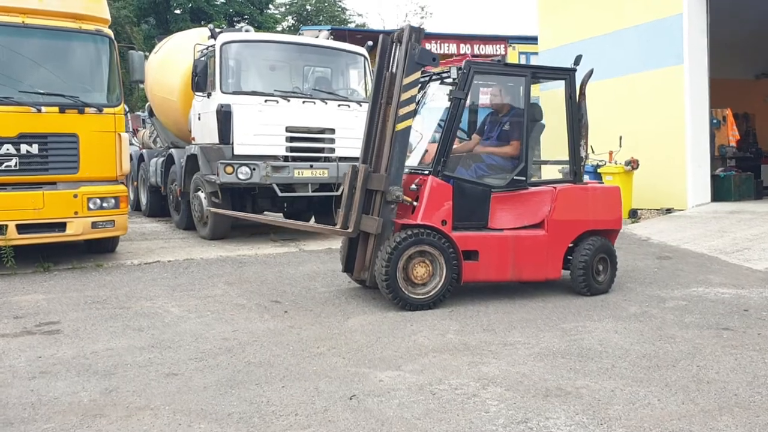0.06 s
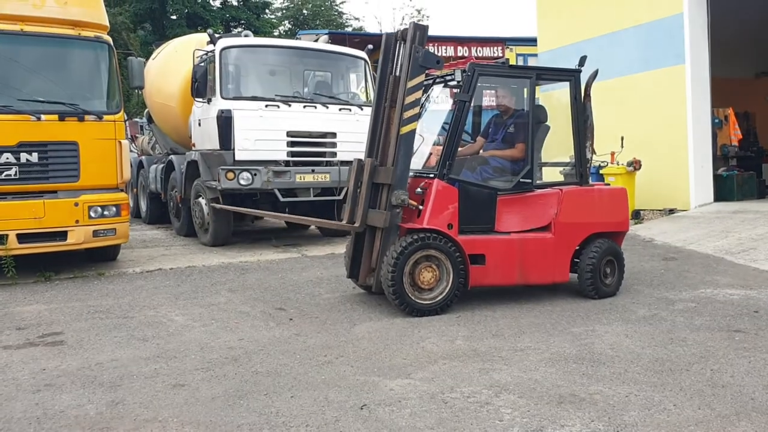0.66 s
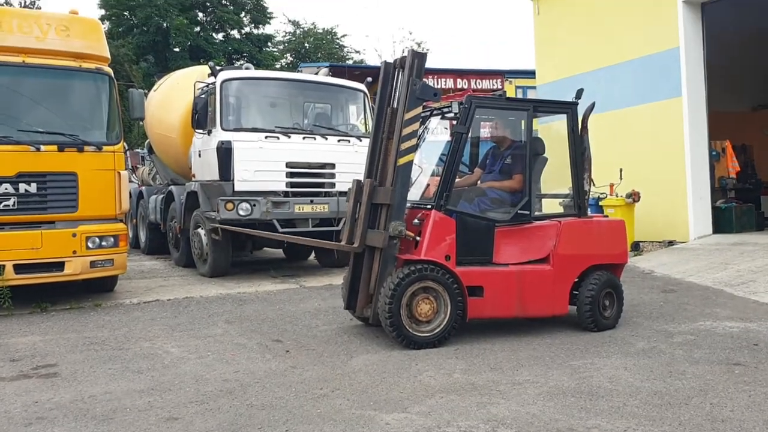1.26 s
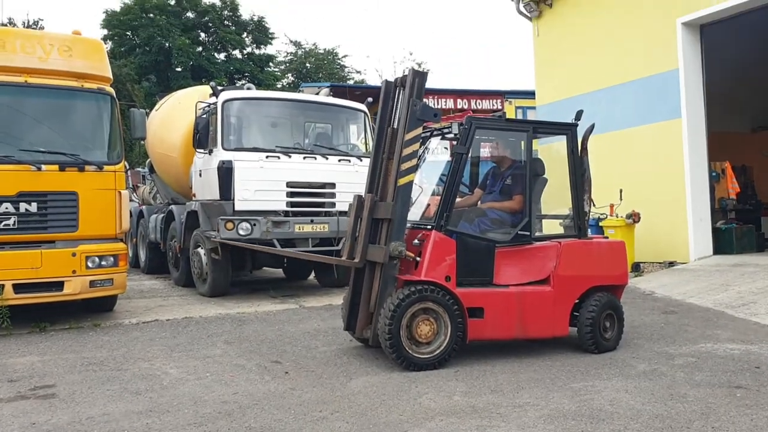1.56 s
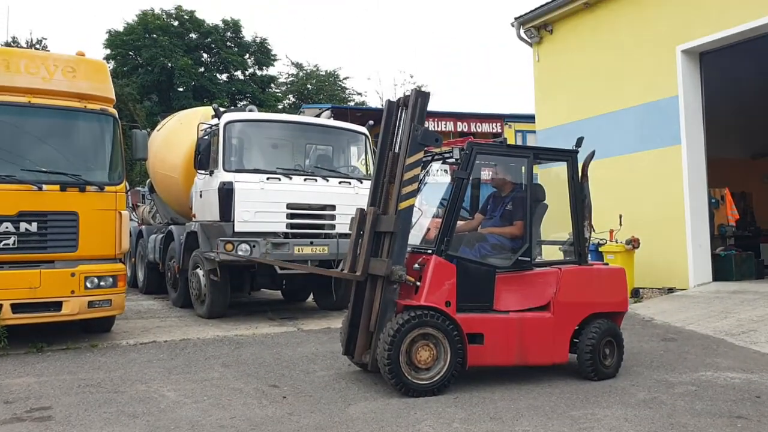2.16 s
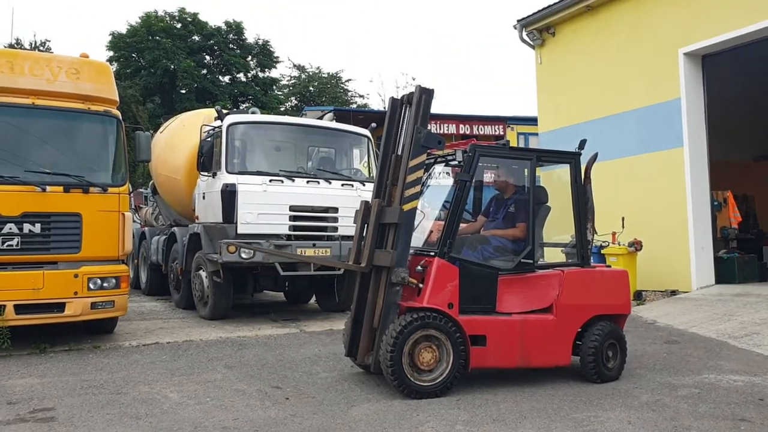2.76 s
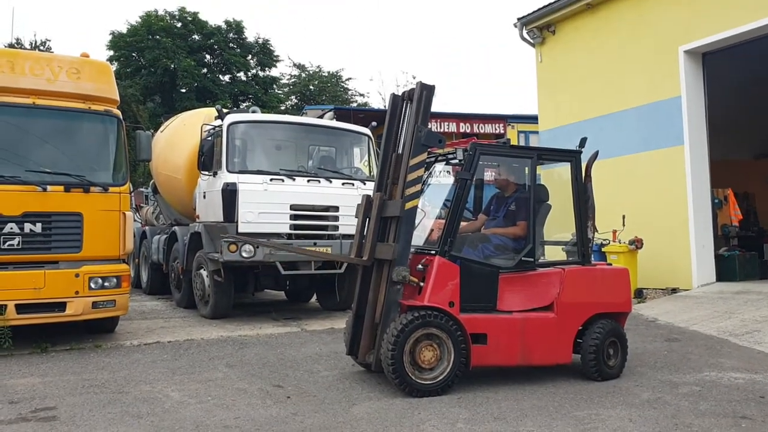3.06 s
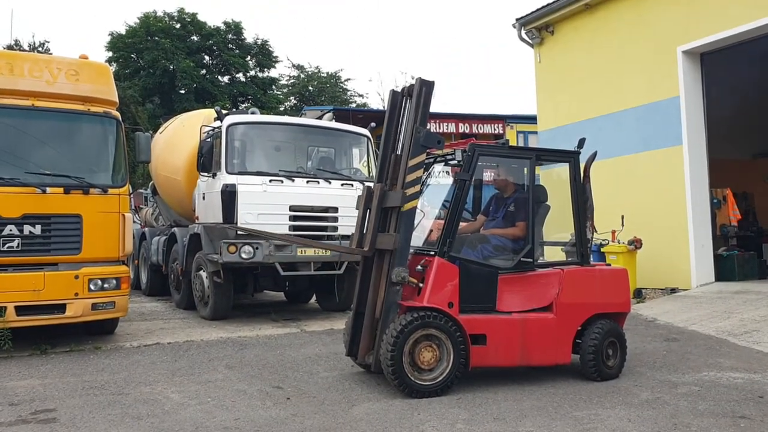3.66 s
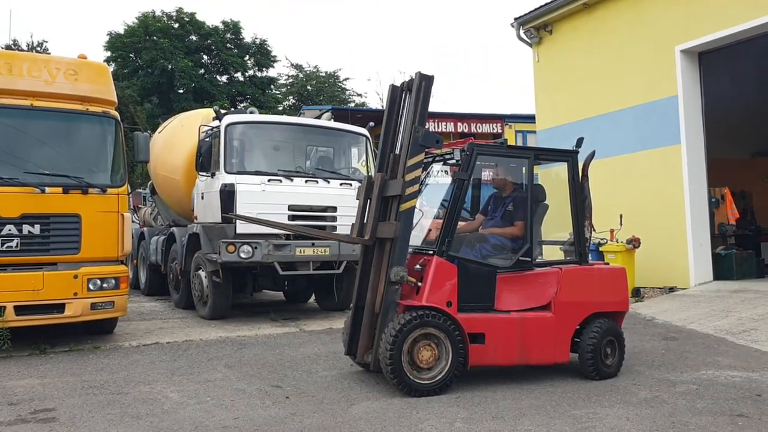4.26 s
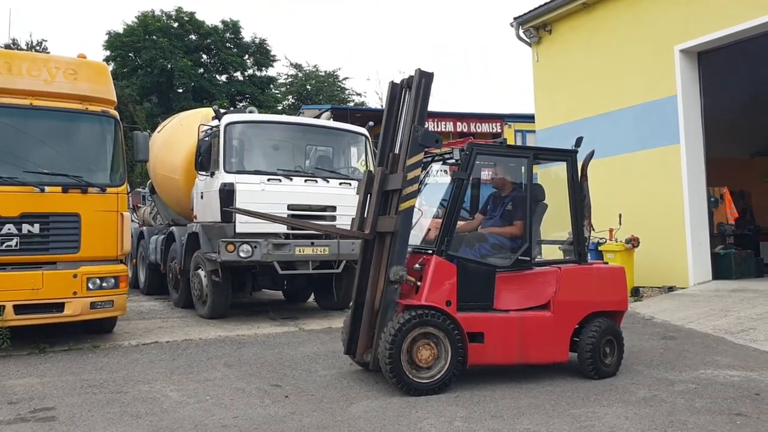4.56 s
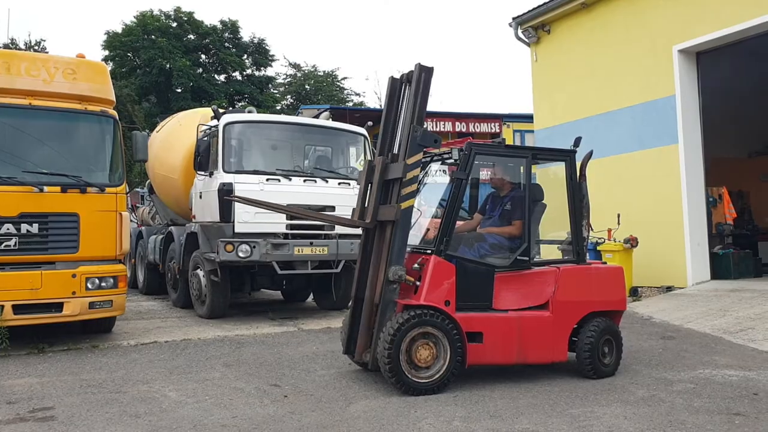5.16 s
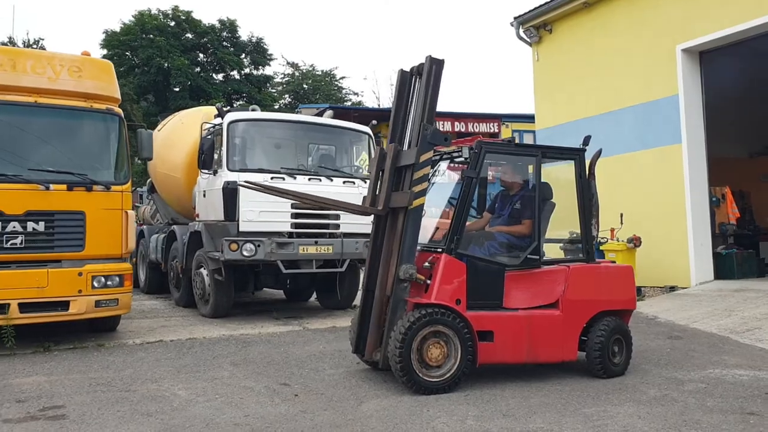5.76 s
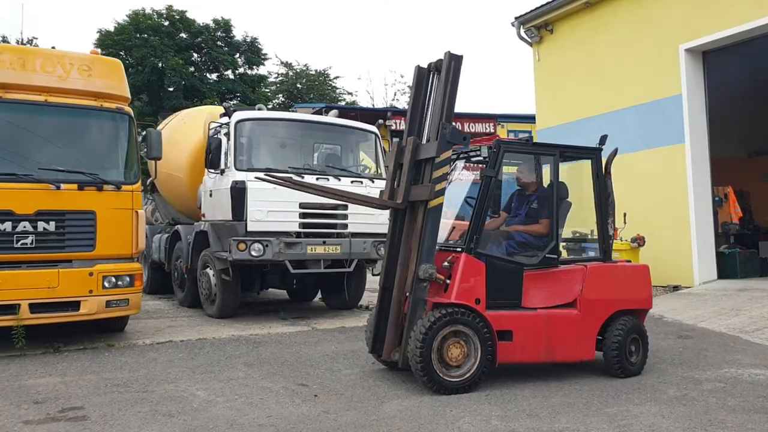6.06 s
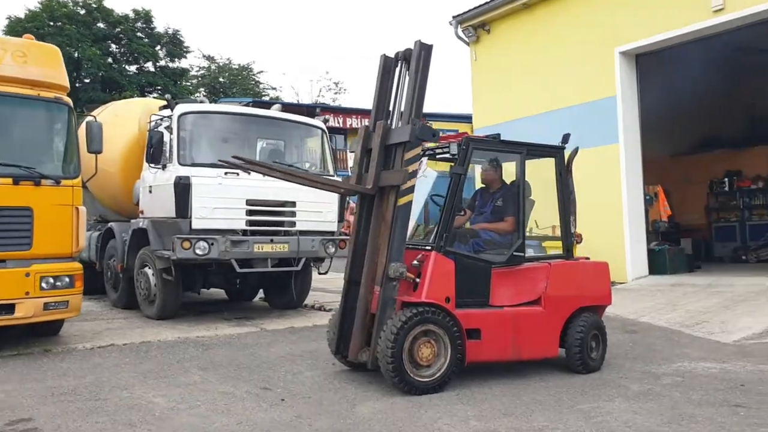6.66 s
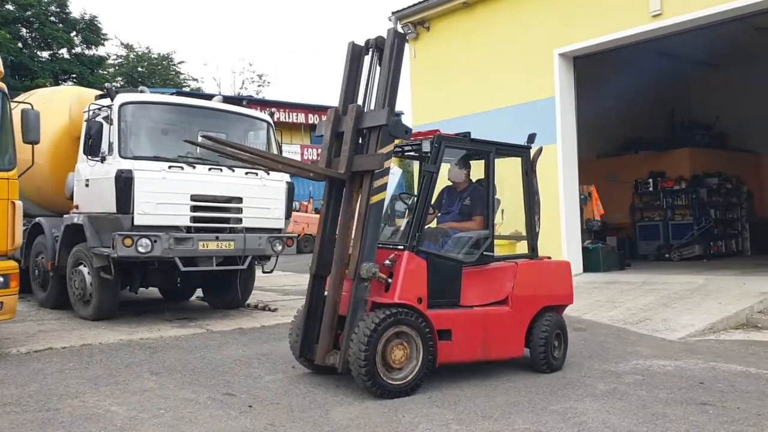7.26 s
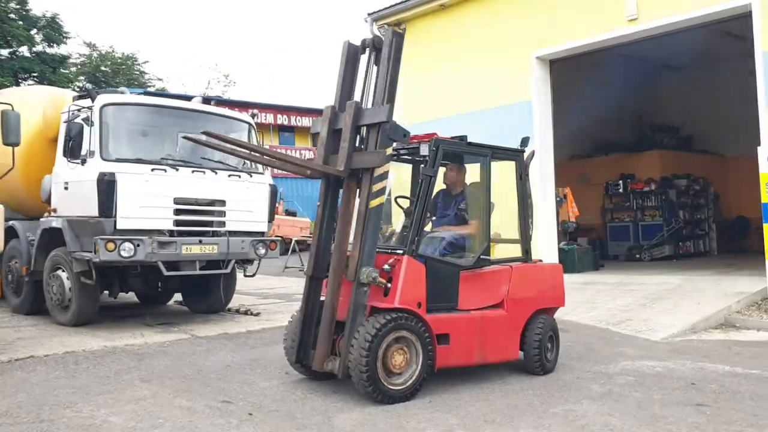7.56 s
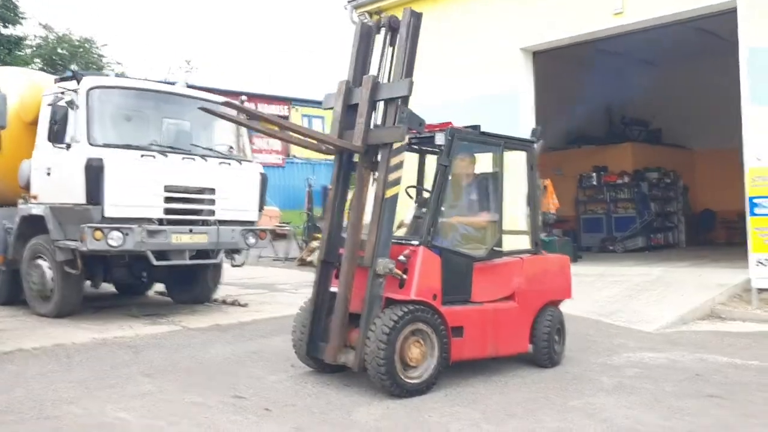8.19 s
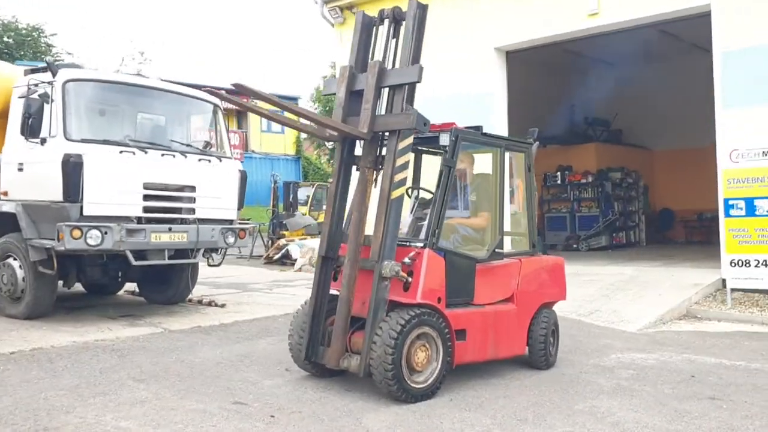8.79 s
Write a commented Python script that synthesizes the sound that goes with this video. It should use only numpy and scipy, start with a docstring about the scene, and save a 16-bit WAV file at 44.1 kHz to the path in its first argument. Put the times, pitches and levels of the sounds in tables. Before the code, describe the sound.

A diesel forklift is already idling at the start, heard from nearby in an open yard through a hand-held stereo microphone, with the clatter leaning to the left. Its exhaust gives a deep, even throb under a fast metallic rattle and fine ticking. Thin, slightly wavering whines from the gears, fan and hydraulic pump sit over a low rumble. Hollow knocks stand out of the engine's rhythm at irregular moments, the hardest at about 1.6 seconds.

At about 5.8 seconds the throttle opens: the engine surges briefly, climbs moderately in pitch within half a second, and then holds that faster, slightly louder pace. From about 6.7 seconds the truck turns and rolls off, so the whines shift in tone and the low exhaust hum grows fuller. The engine is still running strongly at the end, near 9 seconds.

```python
"""A diesel forklift chugs and clatters at idle in a yard, then speeds up and rolls off.
Its four cylinders fire in turn: each firing booms out of the exhaust and knocks the metal of the engine.
The gears, the hydraulic pump and the belt-driven fan whine along over a low rumble.
A hand-held pair of microphones hears the bass alike and the treble differently."""
import sys
import numpy as np
from scipy import signal
from scipy.fft import rfft, irfft
from scipy.io import wavfile
from scipy.ndimage import map_coordinates

SR = 44100
rng = np.random.default_rng(int(sys.argv[2]) if len(sys.argv) > 2 else 0)


def store_pcm(level_fs):
    """Save levels as 16-bit WAV."""
    pcm = np.round(np.clip(level_fs, -1, 1) * 32767).astype(np.int16)
    wavfile.write(sys.argv[1], SR, np.atleast_2d(pcm).T)


N = 393813
TIME = np.arange(N) / SR
BINS_HZ = np.fft.rfftfreq(N, 1 / SR)
THROTTLE_S = 5.773  # when the throttle opens

# how far the truck has turned its tail away: time_s, share (0 to 1)
TURNED_AWAY = [(0, 0), (6.7, 0.09), (7.5, 0.76), (8.1, 0.92), (8.93, 0.55)]


def amp(db):
    """Turns decibels into a gain."""
    return np.exp(np.asarray(db, np.float32) * np.float32(np.log(10) / 20))


def unit(x):
    """Scales a signal to an average (rms) level of 1."""
    return x / np.sqrt(np.mean(x ** 2) + 1e-20)


def radians(cycles):
    """The angle within the current cycle."""
    return (2 * np.pi * (cycles - np.floor(cycles))).astype(np.float32)


def ramp(start_s, end_s):
    """Goes evenly from 0 to 1 between two times."""
    return np.clip((TIME - start_s) / (end_s - start_s), 0, 1)


def over_time(points):
    """Reads a time table at every sample."""
    return np.interp(TIME, *np.transpose(points))


def over_hz(points):
    """Reads a pitch table at every frequency."""
    hz, value = np.transpose(points)
    return np.interp(np.log(BINS_HZ + 1), np.log(hz + 1), value)


def colour(x, points):
    """Shapes a sound's lows and highs by a table, cuts what lies outside it, and scales to level 1."""
    edges = 1 / (1 + (BINS_HZ / points[-1][0]) ** 16 + (points[0][0] / (BINS_HZ + 1)) ** 16)
    return unit(irfft(rfft(x) * amp(over_hz(points)) * edges, N))


def drift(hz, size=2048):
    """Two slow random curves of level 1."""
    rates = np.fft.rfftfreq(size, N / SR / size)
    slow = irfft(rfft(rng.standard_normal((2, size))) / (1 + (rates / hz) ** 2), size)
    return np.array([np.interp(TIME, np.linspace(0, TIME[-1], size), unit(row)) for row in slow])


def tone(cycles, db, waver, waver_hz):
    """A note whose strength and timing wander along two paths through the yard."""
    phase = radians(cycles + rng.random()) + waver * drift(waver_hz)
    strength = np.sqrt(2 / (1 + waver ** 2)) * amp(db) * (1 + waver * drift(waver_hz))
    return strength * np.sin(phase.astype(np.float32))


def rev_up(lag_s=0.106):
    """From idle (0) to revved (1): the heavy flywheel starts slowly, gathers pace and levels off."""
    age = np.maximum(TIME - THROTTLE_S, 0) / lag_s
    return 1 - (1 + age) * np.exp(-age)


def fuel_surge(peak_db=3, rise_s=0.11):
    """Extra loudness in dB from a surge of fuel, which is cut back as the engine reaches speed."""
    age = np.maximum(TIME - THROTTLE_S, 0) / rise_s
    return peak_db * (age * np.exp(1 - age)) ** 2


def yard_rumble(revved):
    """Low noise in the yard, louder once the engine revs."""
    # the rumble's tone colour: pitch_hz, relative_db
    rumble_shape = [(12, -11), (25, -7), (50, -8), (75, 6)]
    return amp(-43.5 + 6.1 * revved) * colour(rng.standard_normal((2, N)), rumble_shape)


def gear_whine(turns, revved):
    """Gears turn with the crankshaft, so their notes rise with engine speed."""
    # gear and weaker pump notes: cycles_per_turn (rounded below), idle_db, revved_db, turned_change_db
    gear_notes = [(18, -46, -52, 1), (25, -69, -43.5, -8), (28, -55, -44, -4), (30, -54, -40, -3.5),
                  (36, -54.5, -46, -5), (51, -62, -60.5, 14), (56, -53, -52.5, 5.5),
                  (64.2, -70, -46.5, -15), (72.4, -61, -59, 1), (81.54, -66, -40.5, -3.5),
                  (83.4, -59, -50, 7), (112.7, -61, -55, -11), (117.5, -48, -71, 15),
                  (128.5, -57.5, -62, 6)]
    turned, out = over_time(TURNED_AWAY), 0
    for per_turn, idle_db, revved_db, turned_db in gear_notes:
        db = idle_db + (revved_db - idle_db) * revved + turned_db * turned
        out += tone(np.round(per_turn) * turns, db, waver=0.31, waver_hz=6.6)
    return out


def belt_whine(turns, revved, pulley_ratio=1.3917):
    """A belt spins the six-blade fan and the alternator faster than the crankshaft."""
    # fan and alternator notes: cycles_per_pulley_turn (rounded below), idle_db, revved_db
    belt_notes = [(4, -46.5, -49), (6, -42.5, -35.5), (16, -52, -64), (32, -46.5, -52), (48, -52, -51),
                  (96.5, -56, -64)]
    out = 0
    for per_turn, idle_db, revved_db in belt_notes:
        db = idle_db + (revved_db - idle_db) * revved
        out += tone(np.round(per_turn) * pulley_ratio * turns, db, waver=0.14, waver_hz=2.3)
    return out


def pump_whine(turns, rpm, revved, teeth=9, revved_gain_db=6.5):
    """The pump's teeth ripple the oil pressure; a note swells near a pitch at which the casing rings."""
    # how strongly the casing sounds a note at idle: pitch_hz, level_db
    casing_levels = [(790, -47.5), (860, -50), (930, -69), (941, -47), (1580, -49.5), (1745, -44.5),
                     (1770, -50), (1855, -61), (1885, -47), (1970, -48), (2030, -47), (2066, -42),
                     (2250, -59)]
    # each note beams its own way: cycles_per_tooth, early_change_db, turned_change_db
    pump_notes = [(5, 2, -9), (10, -1.5, 4), (11, -2, -16), (12, 5.5, -6)]
    early = 1 - ramp(1.6, 1.9)  # ends as the hand-held microphones settle into place
    turned, out = over_time(TURNED_AWAY), 0
    for per_tooth, early_db, turned_db in pump_notes:
        per_turn = teeth * np.round(per_tooth)
        casing_db = np.interp(per_turn * rpm / 60, *np.transpose(casing_levels))
        db = casing_db + revved_gain_db * revved + early_db * early + turned_db * turned
        out += tone(per_turn * turns, db, waver=0.28, waver_hz=7)
    return out


def knocks(turns, cylinders_db, lead, fade, steady, repeat, uneven_db=1.3):
    """Each firing adds a burst to a steady rattle; lead and fade are counted in crankshaft turns."""
    firing = 2 * (turns + lead)
    age, count = (firing % 1) / 2, firing.astype(int)
    chance = rng.standard_normal(size=512)[count]  # no two firings are equally hard
    strength = amp(np.array(cylinders_db)[count % len(cylinders_db)] + uneven_db * chance)
    burst = strength * np.exp(-age / fade) * (1 - np.exp(-age / 0.0082))
    # the share "repeat" of the rattle comes back every engine cycle (two turns)
    loops = rng.standard_normal((2, 5000))
    place = (turns / 2 % 1) * loops.shape[1]
    pattern = np.array([map_coordinates(loop, [place], mode="grid-wrap") for loop in loops])
    rattle = np.sqrt(repeat) * pattern + np.sqrt(1 - repeat) * rng.standard_normal((2, N))
    return rattle * np.sqrt(burst ** 2 + steady ** 2)


def metal(x, fade_s=0.0073, share=0.36):
    """Cast metal adds a short ring made of many close pitches."""
    tail = rng.standard_normal(size=(2, 1024)) * np.exp(-np.arange(1024) / SR / fade_s)
    tail /= np.linalg.norm(tail, axis=1, keepdims=True)
    return x + share * signal.oaconvolve(x, tail, axes=1)[:, :N]


def resonate(x, hz, width_hz):
    """Makes a sound ring at one pitch, scaled to level 1."""
    r = np.exp(-np.pi * width_hz / SR)
    return unit(signal.lfilter([1, 0, -1], [1, -2 * r * np.cos(2 * np.pi * hz / SR), r * r], x))


def ringing_parts(turns, revved):
    """The firings strike a few metal parts that each ring at a clear pitch."""
    # the parts that ring: pitch_hz, width_hz, idle_db, revved_db
    parts = [(1710, 47, -47.5, -54), (3263, 47, -53.5, -56), (3477, 62, -59, -51.5), (3780, 54, -63, -52),
             (3856, 73, -55.5, -70), (4580, 54, -69, -60), (5600, 87, -64, -52.5), (6310, 120, -52.5, -72),
             (7640, 32, -76, -76), (10400, 60, -78, -69)]
    blows = knocks(turns, [1.6, 0.93, 0.5, 1.6], lead=0.093, fade=0.33, steady=0.32, repeat=0.64,
                   uneven_db=1.9)
    return sum(amp(idle_db + (revved_db - idle_db) * revved) * resonate(blows, hz, width_hz)
               for hz, width_hz, idle_db, revved_db in parts)


def hollow_knock(turns, pitch_hz=600, swell_s=0.0036, usual_db=-33, uneven_db=2, trim_db=-2.5):
    """Every two turns the last cylinder thumps the engine's case, now and then much harder."""
    # the hardest thumps: start_s, level_db (before trim_db)
    hard_thumps = [(0.197, -24), (0.426, -22), (0.652, -26), (0.768, -22), (1.565, -20.5), (2.246, -25),
                   (2.587, -25), (2.7, -25), (2.928, -24), (3.384, -25), (3.84, -23.5), (4.068, -22),
                   (4.636, -26), (5.204, -26), (5.883, -22), (6.185, -24)]
    starts = np.flatnonzero(np.diff(np.floor((turns + 0.5) / 2)))
    levels_db = usual_db + uneven_db * rng.standard_normal(len(starts))
    for start_s, db in hard_thumps:
        nearest = np.argmin(abs(starts - start_s * SR))
        starts[nearest], levels_db[nearest] = round(start_s * SR), db
    blows = np.zeros(N)
    blows[starts] = amp(levels_db)
    age = TIME[:SR // 20]
    thump = age / swell_s * np.exp(1 - age / swell_s) * np.sin(2 * np.pi * pitch_hz * age)
    return amp(trim_db) * signal.oaconvolve(blows, thump)[:N]


def diesel_clatter(turns, revved):
    """The firings rattle every part of the engine, and each part favours different cylinders."""
    # tone colours of the rattling parts, from low to high: pitch_hz, relative_db
    muffler = [(50, -10), (85, -2), (140, -8), (193, -7), (339, -10.5), (443, -29), (480, -40), (620, -48),
               (1060, -120)]
    panels = [(250, -22), (420, -5.5), (449, -12), (520, 0), (610, -3), (737, 1), (773, 1), (874, -2),
              (1010, -9), (1300, -15.5), (1690, -30), (2860, -120)]
    covers = [(1000, -3.5), (1200, -6.5), (1450, -2), (1680, -3), (1850, -2), (2120, -3.5), (2260, -9),
              (2360, -5), (2480, -16), (2700, -29)]
    block = [(1410, -14), (2400, -4), (2480, -7), (2660, -8), (2980, -7.5), (3390, -4.5), (3800, -4),
             (4410, -12.5), (4800, -17.5), (6240, -32), (10600, -120)]
    injectors = [(2710, -24), (4600, -12), (4910, -4.5), (5460, 2.5), (6240, 0.5), (6930, -8),
                 (8720, -12.5), (10000, -35), (13000, -48), (22000, -120)]
    airy_top = [(5590, -2.5), (9500, -1), (10200, -9), (11200, 0.5), (12300, -1), (15500, -2)]
    puffs = knocks(turns, [-1, 1, -1, 1], lead=0.022, fade=0.1, steady=0.5, repeat=0.25)
    thuds = knocks(turns, [-2, -1, -0.5, 0], lead=0.06, fade=0.2, steady=0.5, repeat=0.42, uneven_db=1.1)
    clacks = knocks(turns, [6.5, 0, -11, -9], lead=0.07, fade=0.12, steady=0.99, repeat=0.45)
    cracks = knocks(turns, [4.5, -7, -7, -4], lead=0.073, fade=0.23, steady=0.86, repeat=0.12)
    ticks = knocks(turns, [1.7, 0.54, 1.8, 0.067], lead=0.064, fade=0.25, steady=0.64, repeat=0.14)
    sizzle = knocks(turns, [-0.51, -2, 0, -1], lead=0.061, fade=0.25, steady=1, repeat=0.05,
                    uneven_db=1.5)
    fuel_db, turned = fuel_surge(), over_time(TURNED_AWAY)
    out = amp(-38 + 2.3 * revved - 2 * turned + fuel_db) * colour(puffs, muffler)
    out += amp(-35 + 2.2 * revved - 1.1 * turned + fuel_db) * colour(thuds, panels)
    out += amp(-36 + 2.35 * revved + 0.62 * turned + 0.5 * fuel_db) * colour(metal(clacks), covers)
    out += amp(-43.5 + 2.36 * revved - 0.37 * turned + 0.5 * fuel_db) * colour(metal(cracks), block)
    out += amp(-47 + 3.2 * revved + 1.4 * turned + 0.87 * fuel_db) * colour(metal(ticks), injectors)
    out += amp(-53.5 + 3.3 * revved + 0.9 * fuel_db) * colour(metal(sizzle), airy_top)
    return out


def exhaust_boom(turns, revved, lag_turns=1.49, spread=0.45):
    """Two firings a turn boom out of the pipe; unequal cylinders add a throb every two turns."""
    # the firing note and its octave: idle_db, revved_db, rolled_change_db, bend (over 1 changes late)
    boom_notes = [(-35.7, -26, -4, .45), (-19.3, -29.5, 9, 1.8)]
    # weaker engine notes: cycles_per_turn (rounded to halves below), idle_db, revved_db
    weak_notes = [(3.5, -41.5, -49.5), (4.5, -46, -40.5), (5.5, -46, -49.5), (6, -39, -29.5),
                  (6.5, -45, -40), (7, -49, -54), (7.5, -53, -51), (8, -43.5, -45), (9, -57, -38),
                  (10, -45, -47.5), (10.5, -65.5, -43), (11, -53, -47.5), (12, -48.5, -42),
                  (14, -64, -47.5), (16, -49, -51.5), (20, -51.5, -54.5), (38.16, -57, -52)]
    pipe_turns = turns - lag_turns
    rolled = ramp(6.75, 8.44)  # the truck rolls away
    surge_db, out = 0.83 * fuel_surge(), 0
    for harmonic, (idle_db, revved_db, rolled_db, bend) in enumerate(boom_notes, 1):
        db = idle_db + (revved_db - idle_db) * abs(revved) ** bend + rolled_db * rolled
        out += amp(db) * np.cos(radians(2 * harmonic * pipe_turns))
    for per_turn, idle_db, revved_db in weak_notes:
        per_turn = np.round(2 * per_turn) / 2
        smear = np.float32(spread * (per_turn - 4) ** 2)  # the pipe spreads each pulse out in time
        db = idle_db + (revved_db - idle_db) * revved + surge_db
        out += amp(db) * np.cos(radians(per_turn * pipe_turns) + smear)
    return -np.sqrt(2) * out


def microphones(paths):
    """Blends two sound paths into left and right: alike in the bass, unlike and left-heavy higher up."""
    # how much louder the left is: pitch_hz, difference_db
    balance = [(60, 1.33), (380, 3), (750, 3.5), (1300, 8.5), (2000, 12), (2800, 6), (3700, 14.5),
               (4700, 0), (6300, 12), (8100, 13), (10000, 2.5), (12000, -2), (15000, -0.5)]
    # how alike the two sides are: pitch_hz, likeness (0 to 1)
    likeness = [(60, 1), (290, 0.97), (640, 0.94), (1400, 0.66), (2400, 0.49), (4400, 0.26), (12000, .25)]
    # how far the left runs ahead: pitch_hz, lead_radians
    left_lead = [(60, 0.041), (1200, -.2), (1900, -2.03), (3000, -1.4), (15000, -1.6)]
    first, second = rfft(paths)
    same, lead, left_gain = np.clip(over_hz(likeness), -1, 1), over_hz(left_lead), amp(over_hz(balance))
    right = same * np.exp(-1j * lead) * first + np.sqrt(1 - same ** 2) * second
    centre_gain = np.sqrt(left_gain ** 2 + 1 + 2 * left_gain * same * np.cos(lead)) / 2
    return irfft(np.array([left_gain * first, right]) / centre_gain, N)


def scene():
    """The turning crankshaft sets the pace for every part of the engine."""
    idle_rpm, revved_rpm = 1054.9, 1254.9  # turns a minute
    sway_rpm, sway_period_s, sway_peak_s = 1.77, 3.807, 1.963  # the speed regulator sways slowly
    revved = rev_up()
    sway = sway_rpm * np.cos(2 * np.pi * (TIME - sway_peak_s) / sway_period_s)
    rpm = idle_rpm + (revved_rpm - idle_rpm) * revved + sway
    turns = np.cumsum(rpm / 60) / SR
    direct = (exhaust_boom(turns, revved) + hollow_knock(turns)) * np.array([[1], [0]])  # one path only
    rumble = yard_rumble(revved)
    whine = gear_whine(turns, revved) + belt_whine(turns, revved) + pump_whine(turns, rpm, revved)
    clatter = diesel_clatter(turns, revved) + ringing_parts(turns, revved)
    return microphones(rumble + whine + clatter + direct)


def record(dry):
    """Cuts off the very highest treble."""
    low_pass = signal.firwin(511, cutoff=15800, window=("kaiser", 9), fs=SR)
    return signal.oaconvolve(dry, low_pass[None], "same")


dry = scene()
out = record(dry)
store_pcm(out)
```